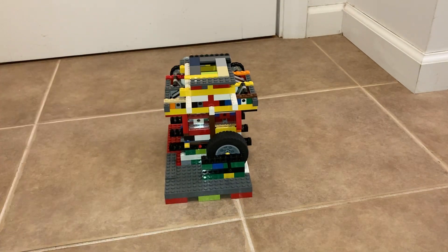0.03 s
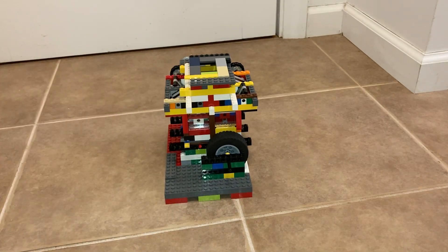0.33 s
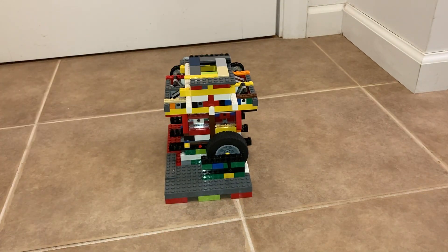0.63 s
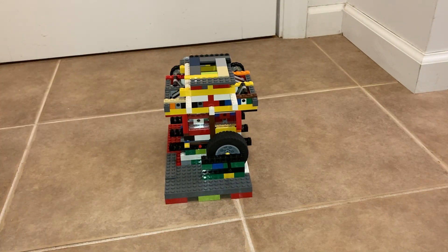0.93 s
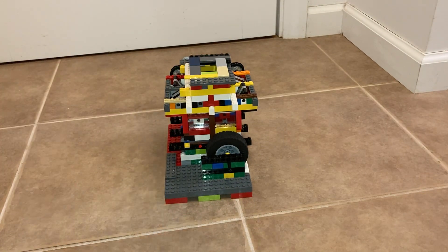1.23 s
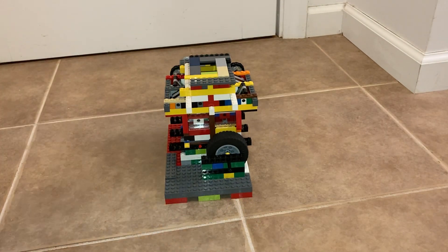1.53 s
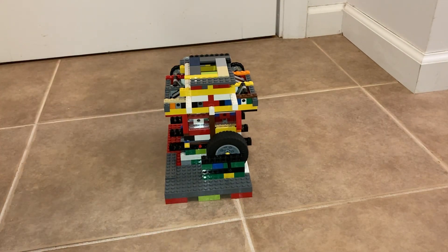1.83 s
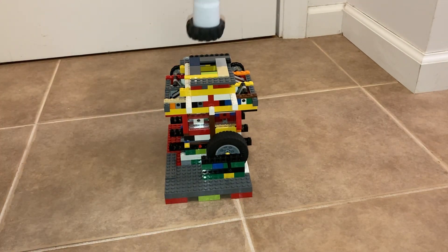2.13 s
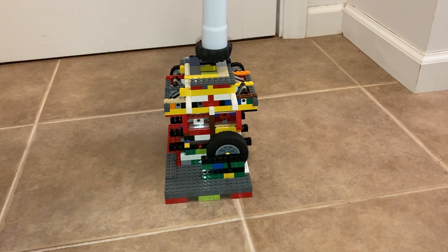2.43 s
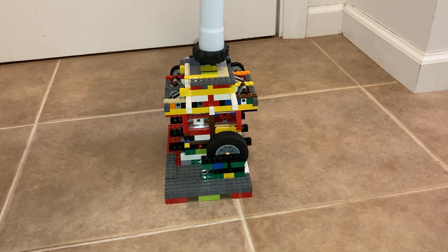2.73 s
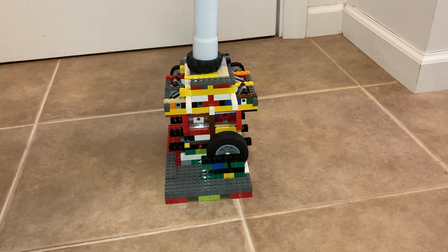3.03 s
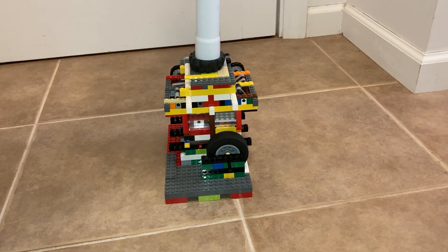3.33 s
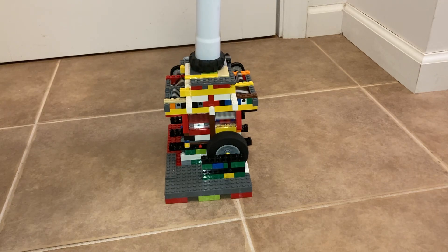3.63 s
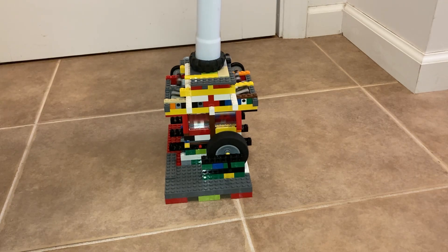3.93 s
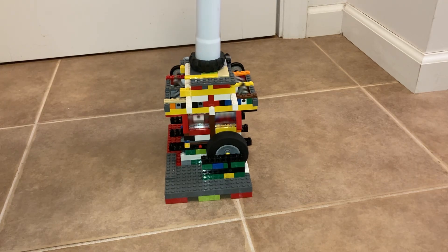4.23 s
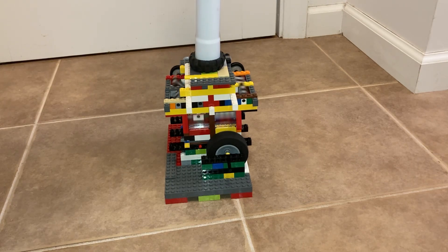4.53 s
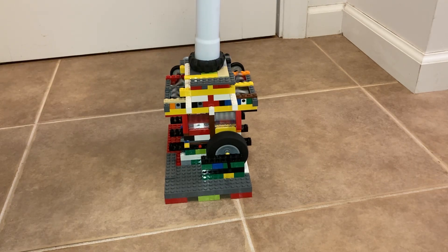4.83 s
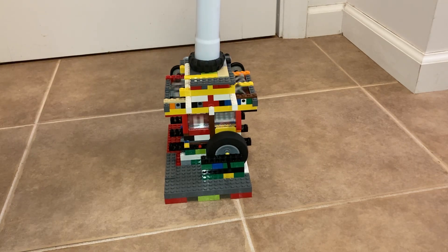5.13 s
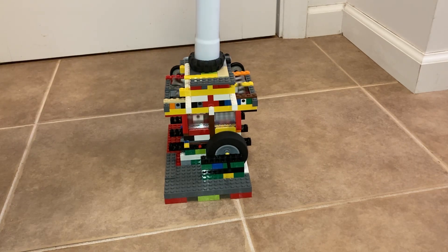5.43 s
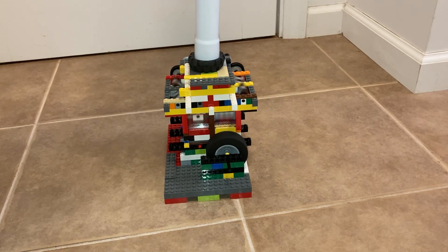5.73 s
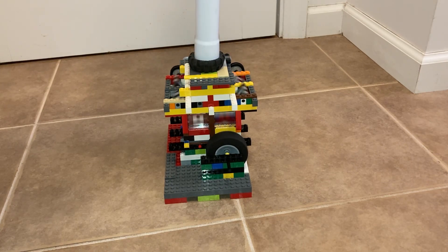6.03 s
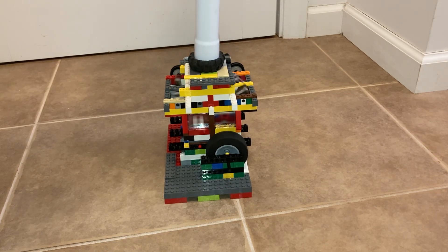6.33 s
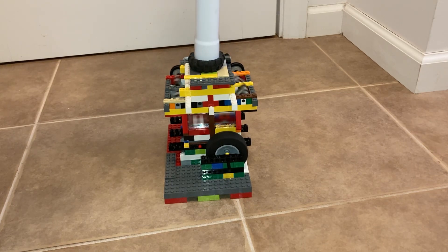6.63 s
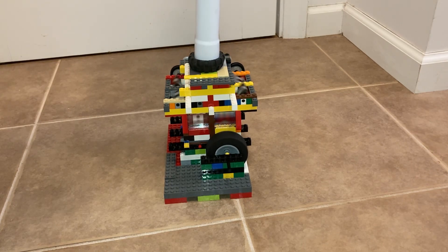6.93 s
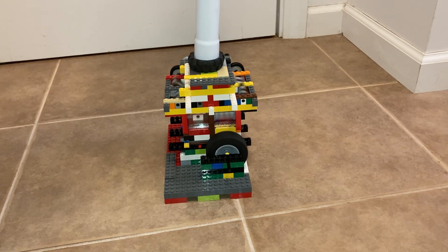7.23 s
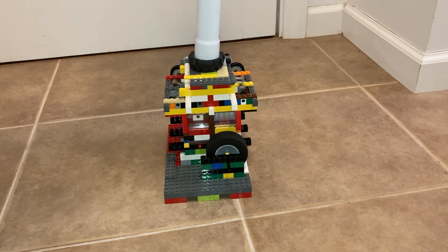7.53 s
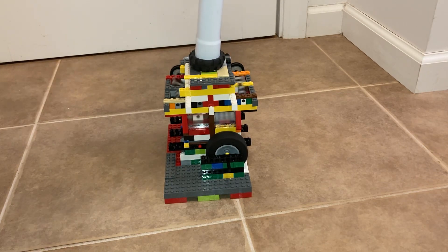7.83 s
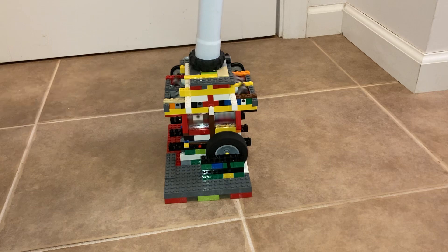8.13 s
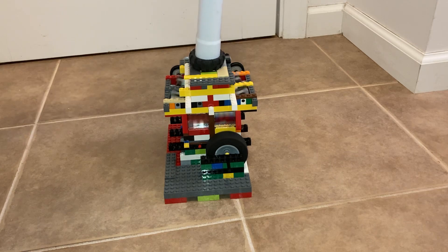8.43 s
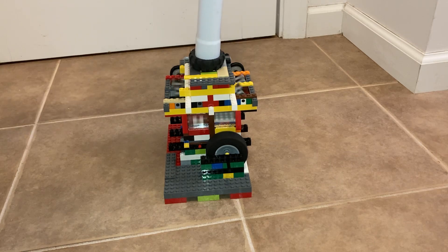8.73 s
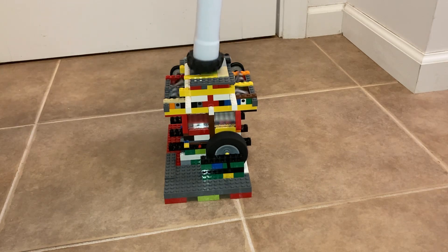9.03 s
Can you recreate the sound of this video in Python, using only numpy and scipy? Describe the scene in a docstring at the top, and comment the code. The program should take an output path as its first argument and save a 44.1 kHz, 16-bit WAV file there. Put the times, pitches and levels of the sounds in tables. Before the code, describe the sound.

A vacuum cleaner spins up to a piercing whine and rush of air, then its suction drives a small rattling, thrumming toy brick engine.

```python
"""A vacuum cleaner spins up to a piercing whine as its fan blades chop the air, in a small tiled room.
First come the knocks and swishes of picking it up. Switched on, its motor jolts, growls and hums,
a bearing squeals briefly and air rushes in. The hose is then set on a little engine of plastic bricks,
which the suction turns: air whistles through its gaps, its piston thrums and its parts rattle.
It is all heard from two points close together, left and right."""
import sys
import numpy as np
from scipy import signal
from scipy.fft import rfft, irfft, next_fast_len
from scipy.io import wavfile
from scipy.ndimage import uniform_filter1d

SR = 44100
rng = np.random.default_rng(int(sys.argv[2]) if len(sys.argv) > 2 else 0)


def output_pcm(signal):
    """Save a mono or channel-first signal as 16-bit PCM at the path in sys.argv[1].

    Samples are clipped to [-1, 1] before scaling.
    """
    pcm = np.clip(np.atleast_2d(signal).T, -1, 1) * 32767
    wavfile.write(sys.argv[1], SR, np.round(pcm).astype(np.int16))


N = 405719
TIME = np.arange(N) / SR
FREQS = np.fft.rfftfreq(N, 1 / SR)

# How alike a noise is on the left and right: pitch_hz, likeness (0 to 1)
SIDE_LIKENESS = [(30, .998), (100, .98), (300, .9), (550, .35), (2000, .3), (4400, .2), (6000, .4),
                 (6900, .9), (7700, .7), (9200, .96), (10200, .7), (11400, .95), (12500, .7), (13700, .97)]
# How much louder the left side is: pitch_hz, left_minus_right_db
SIDE_BALANCE = [(60, 9.5), (200, -9.5), (380, 2), (700, 2.5), (1290, 3), (2380, 3), (4400, 1.5), (8000, 0)]
# How far the left wave runs ahead of the right: pitch_hz, left_lead_rad
SIDE_LEAD = [(0, 0), (2000, 0), (3300, 1.4), (5600, 2.4), (6700, .1), (7400, -.3), (9200, -3.14),
             (11400, -6.28), (12300, -6.8), (13600, -9.42), (14400, -9.7), (15300, -12.5)]
# Tone colour of the quiet room: pitch_hz, gain_db
ROOM_COLOUR = [(10, -18), (25, -4), (70, 4), (150, -7), (500, -7), (1500, -17.5), (15000, -20.5)]
# Tone colour of the hose sliding over cloth: pitch_hz, gain_db
CLOTH_COLOUR = [(100, -16), (900, -13), (2200, 1), (4500, 3), (8000, -0.5), (15000, 0)]
# Each slide of the hose: middle_s, half_length_s, level_db
HOSE_SLIDES = [(0.652, 0.075, -64), (0.92, 0.081, -58.5), (1.192, 0.047, -55), (1.29, 0.028, -57),
               (1.42, 0.038, -46.5), (1.598, 0.06, -41.5)]
# Handling knocks, then the switch: start_s, level_db, pitch_hz, width_octaves, ring_s (to fall 60 dB)
HAND_KNOCKS = [(0.0, -40.5, 2380, 1.26, 0.34), (0.003, -42, 218, 1.1, 0.34), (.254, -56, 407, 0.66, 0.85),
               (.394, -61, 4800, 0.18, 0.3), (.417, -51, 4850, 0.15, 0.08), (.6, -49.5, 169, 0.4, 0.13),
               (.598, -64, 2500, 1.7, 0.13), (.705, -47.5, 85, 0.85, 0.2), (0.706, -60, 2500, 3.2, .2),
               (.795, -59.5, 260, .8, 0.7), (0.956, -46.5, 3650, 1.47, 0.3), (1.37, -60, 130, 0.83, .25),
               (1.494, -38.5, 3480, 1.46, 0.11), (1.53, -45, 606, 0.38, 1)]
# Resonances (favoured pitches) of the plastic wand, heard in every knock: pitch_hz, width_hz, gain_db
WAND_RESONANCES = [(344, 18, 10), (590, 36, 4), (2220, 170, 7), (4820, 160, 9), (6550, 270, -11)]

# Speed of the brick engine: time_s, turns_per_s
CRANK_SPEED = [(3.1, 0), (3.5, 7.5), (4.2, 11.5), (4.5, 14.3), (4.72, 15.2), (5.2, 16.2), (6.2, 16.5),
               (6.8, 16.9), (7.7, 16.8), (8.3, 16), (8.9, 14.1), (9.2, 11)]
# Notes of its loose bricks: pitch_hz, width_hz, gain_db
BRICK_NOTES = [(934, 55, -5), (1028, 31, -2.5), (1113, 58, 3.5), (1370, 115, -4.5), (1600, 150, 4),
               (1824, 150, 0)]
# Resonances of its frame: pitch_hz, width_hz, gain_db
FRAME_RESONANCES = [(97, 14, -7), (187, 12, 3)]
# Single puffs as its piston gets going: peak_s, level_db
FIRST_PUFFS = [(3.39, -49), (3.665, -49), (3.82, -41), (3.95, -48), (4.1, -47), (4.165, -47)]
# Tones in the piston's thrum: beats_per_turn, gain_db
THRUM_TONES = [(2, -18), (4, 0.5)]
# How hard the piston works: time_s, thump_db, throb_db
PISTON_EFFORT = [(3.1, -75, -85), (3.95, -63, -62), (4.3, -54, -58), (4.5, -53, -44), (4.85, -49.5, -43.5),
                 (5.2, -48, -58), (6.2, -49.5, -64), (7.2, -46, -66), (7.6, -47.5, -57), (7.9, -48.5, -44),
                 (8.25, -55, -45), (8.9, -60, -47), (9.2, -62, -66)]

# How much of the air is drawn through the bricks: time_s, share (capped at 1 when used)
HOSE_SEAL = [(2.2, 0), (2.9, 0.01), (3.5, 0.23), (4.4, 0.8), (5, 1.11), (7.6, 0.82), (8.7, 0.64),
             (9.1, 0.37)]
# Tone colour of air entering the open hose: pitch_hz, gain_db
OPEN_AIR_COLOUR = [(15, -37), (60, -19), (90, -12), (200, -11), (300, -2.5), (430, -1), (780, -5),
                   (950, -2.5), (2300, 2.5), (2800, -2), (3900, -1), (6500, -13.5), (8400, -11.5),
                   (11500, -16.5), (15000, -20.5)]
# Tone colour of air passing through the bricks: pitch_hz, gain_db
BRICK_AIR_COLOUR = [(15, -36), (60, -12), (97, -3), (130, -7), (220, -5.5), (350, -4.5), (430, -4.5),
                    (750, -5), (1030, -1.5), (2300, -1.5), (2900, -4.5), (4200, -5.5), (7000, -11),
                    (8400, -12), (10500, -11), (15000, -17.5)]
# Resonances of the hose and casing: pitch_hz, width_hz, gain_db
HOSE_RESONANCES = [(334, 30, 9), (425, 70, -2.5), (665, 35, 6), (805, 36, 5), (938, 40, 10),
                   (1280, 80, 6.5), (1620, 50, 3), (1903, 45, 6), (2810, 170, -4), (3820, 300, 2.5)]
# Whistles in the gaps between bricks: pitch_hz, width_hz, gain_db
GAP_WHISTLES = [(99, 17, 7), (1055, 52, 5), (1800, 26, 5), (6480, 130, 7.5), (8300, 520, 7.5)]
# Hollow spaces in the cleaner that boom: pitch_hz, width_hz, peak_s, rise_s, fall_s, level_db
CAVITY_NOTES = [(338, 13, 1.84, .03, .6, -44), (938, 7, 2.18, .17, .7, -45),
                (1300, 32, 2.12, .12, .2, -43.5)]

# Notes of the casing as the motor jerks into motion: pitch_hz, level_db, ring_s (to fall 60 dB)
JOLT_NOTES = [(452, -32, .22), (680, -42, .7), (845, -37, .5), (1780, -44, .4), (2320, -45, .35)]
# Tones in the starting growl: cycles_per_turn, level_db
GROWL_TONES = [(3, -50.5), (4, -48), (5, -42.5), (8, -50), (12, -48), (16, -44), (21, -44)]
# Tones of the shaking casing: cycles_per_turn, level_db, starting_boost_db
SHAKE_TONES = [(1, -42, 2), (2, -47, 8), (3, -50, 10), (5, -49, 5), (7, -50, 8)]
# How well the casing and room carry the shaking: pitch_hz, gain_db
CASING_RESPONSE = [(100, -32), (160, -5), (205, 0), (236, -2), (246, -25), (259, -22), (266, -5.5),
                   (275, -5.5), (335, 3), (385, -18), (425, -6), (452, 3), (475, -20), (506, -18), (522, 1),
                   (533, -5), (545, -1), (650, -1), (750, -18), (1200, -14), (1318, 2), (1350, -10),
                   (1900, -10)]
# The lowest shake tone swells and fades as the hose moves: time_s, left_db, right_db
HUM_SWELLS = [(2.0, -1, -1), (2.45, 0, 1), (3.2, -2, -1), (3.45, -8, -8), (3.85, 3, 3.5), (4.25, -3, 0),
              (4.58, 0, 5), (4.75, -8, 2), (6.1, -10, -4), (6.7, -2, 1), (7.3, -18, -7), (8.1, -11, 1)]
# Higher motor tones: cycles_per_turn, level_db
MOTOR_TONES = [(4, -61), (7, -53.5), (36, -63)]
# Standing waves (echoes that add up or cancel) along the whine's climb: pitch_hz, width_hz, gain_db
STANDING_WAVES = [(2000, 50, 8), (2123, 22, 11), (2157, 16, 9), (2196, 16, 10), (2234, 18, 9.5),
                  (2270, 18, 7.5), (2316, 22, 8.5), (2334, 7, -6), (2352, 14, 12.5), (2367, 8, -7),
                  (2391, 16, 11), (2402, 6, -9), (2410, 7, 8), (2418, 5, -11)]
# The blade tone as the moving hose shifts those waves: time_s, left_db, right_db, left_lead_rad
BLADE_TONE = [(2.16, -29, -27.5, 1.77), (2.42, -20, -22.5, 1.5), (2.5, -24, -19, 1.8),
              (2.92, -19, -20.5, 1.65), (3.44, -28, -26.5, 2.1), (3.56, -25, -37, 4), (3.62, -25, -41, 0.5),
              (3.74, -27, -36, 0.5), (4.42, -26, -30, 1.7), (5.03, -25.5, -27, 1.16),
              (5.14, -23, -23, 1.08), (6.8, -21.5, -21.5, 1.02), (7.55, -22.5, -25, 0.66),
              (7.72, -26, -30, 0.35), (8.44, -25, -27.0, 0.42), (8.84, -29.5, -28.5, 0.5),
              (8.98, -47, -44, 0.5), (9.04, -53, -33, 3.4), (9.1, -28.5, -28.5, 4.4), (9.18, -25, -50, 3.6)]
# The overtone at twice its pitch: time_s, left_db, right_db, left_lead_rad
BLADE_OCTAVE = [(2.2, -37, -39, 0.9), (2.28, -52, -55, 0.9), (2.37, -39, -46, 0.8), (2.6, -39, -40, 0.37),
                (2.88, -45, -45, 1.9), (3.05, -43, -41, 3.6), (3.3, -40, -41, 3.6), (3.55, -55, -43, 1.2),
                (3.75, -40, -38.5, 2.6), (3.95, -40, -36, 3.1), (4.2, -52, -41, 1.5),
                (4.68, -52, -44.5, 0.8), (4.79, -39, -33.5, 1.8), (5.5, -35.5, -39, 2.6),
                (6.05, -35.5, -44, 2.3), (7.1, -34, -59, 1.3), (7.55, -36.5, -52, 1.9), (7.69, -51, -45, 2),
                (7.85, -42, -48, 1.8), (8.1, -56, -47, 1.8), (8.6, -60, -50, 1)]
# The overtone at three times its pitch: time_s, level_db
BLADE_THIRD = [(2.25, -48), (2.5, -55), (3.3, -52), (3.7, -45.5), (4.7, -50), (7.45, -51), (7.6, -47),
               (8.5, -47), (8.75, -59)]

FULL_SPEED_HZ = 271.35  # turns of the motor shaft per second
SIDES = np.array([[0.5], [-0.5]])  # splits a difference between left and right


def amp(db):
    """Turn decibels into a gain to multiply by."""
    return 10 ** (np.asarray(db) / 20)


def unit(x):
    """Scale a signal to an average strength (rms) of 1."""
    return x / np.sqrt(np.mean(x ** 2) + 1e-20)


def tone(angle, db):
    """A pure tone at a given rms level."""
    return np.sqrt(2) * amp(db) * np.cos(angle)


def swell(peak_s, rise_s, fall_s):
    """A smooth rise to 1 and a smooth fall."""
    return np.exp(-((TIME - peak_s) / np.where(TIME < peak_s, rise_s, fall_s)) ** 2 / 2)


def over_time(rows):
    """Join the points of a timed table into one curve per value column."""
    times, *columns = np.transpose(rows)
    return [np.interp(TIME, times, column) for column in columns]


def over_pitch(points, hz=FREQS):
    """Look up a table by pitch, joining its points on a log scale."""
    pitches, values = np.transpose(points)
    return np.interp(np.log(hz + 1), np.log(pitches + 1), values)


def bumps(resonances, at=FREQS):
    """The boost or cut in dB that resonances give to each pitch."""
    return sum(db / (1 + (2 * (at - hz) / width) ** 2) for hz, width, db in resonances)


def wander(rate_hz):
    """A smooth random wobble of rms 1, mostly slower than the given rate."""
    t = np.arange(0, N / SR + 0.0084, .001)
    spectrum = rfft(rng.standard_normal(len(t)))
    slow = irfft(spectrum / (1 + (np.fft.rfftfreq(len(t), t[1]) / rate_hz) ** 2), len(t))
    return np.interp(TIME, t, unit(slow))


def noise(gain, size=N):
    """Stereo noise of a given tone colour; its treble reaches one side before the other."""
    size = next_fast_len(size)
    hz = np.fft.rfftfreq(size, 1 / SR)
    left, other = rfft(rng.standard_normal((2, size)))
    likeness = np.clip(over_pitch(SIDE_LIKENESS, hz), 0, 1)
    lag = np.exp(-1j * np.interp(hz, *np.transpose(SIDE_LEAD)))
    right = (likeness * left + np.sqrt(1 - likeness ** 2) * other) * lag
    tilt = amp(over_pitch(SIDE_BALANCE, hz) / 2)
    return irfft(np.array([left * tilt, right / tilt]) * np.interp(hz, FREQS, gain), size)[:, :N]


def room_echo(x, ring_s):
    """Dense echoes off tiles and doors, different on each side."""
    t = TIME[:SR // 2]
    tail = rng.standard_normal((2, len(t))) * (rng.random((2, len(t))) < .05)
    tail *= amp(-60 * t / ring_s) * (t > .004)
    tail /= np.linalg.norm(tail, axis=1, keepdims=True)
    return signal.oaconvolve(np.atleast_2d(x), tail, axes=1)[:, :N]


def still_air(level_db=-65):
    """The faint, low noise of the quiet room."""
    return amp(level_db) * unit(noise(amp(over_pitch(ROOM_COLOUR))))


def swishes():
    """The hose rubs over cloth in short, hissy slides."""
    slides = sum(amp(db) * swell(middle_s, half_s, half_s) for middle_s, half_s, db in HOSE_SLIDES)
    return unit(noise(amp(over_pitch(CLOTH_COLOUR)))) * slides * amp(1.8 * wander(29))


def knocks(attack_s=0.00056, crack=0.55, crack_s=0.0041):
    """Each bump of the plastic wand starts with a crack and dies away in the room."""
    t, out = TIME[:SR // 2], np.zeros((2, N))
    for start_s, db, hz, octaves, ring_s in HAND_KNOCKS:
        band = np.exp(-(np.log2((FREQS + 1) / hz) / octaves) ** 2 / 2)
        colour = band / np.sqrt(FREQS + 20) * amp(bumps(WAND_RESONANCES))
        knock = unit(noise(colour, size=len(t))[:, :len(t)]) * amp(db - 60 * t / ring_s)
        knock *= (1 - np.exp(-t / attack_s)) * (1 + crack * np.exp(-t / crack_s))
        start = round(start_s * SR)
        out[:, start:start + len(t)] += knock
    return out


def ticks(crank, pace, level_db=-50.5, spread_db=5, fade_s=0.0023):
    """Small parts tick at each end of the piston's stroke."""
    strokes = np.diff(np.floor(crank / np.pi), prepend=0)
    strokes *= amp(spread_db * np.clip(rng.standard_normal(N), -2, 2))
    bursts = signal.oaconvolve(strokes, np.exp(-TIME[:SR // 8] / fade_s))[:N]
    bright = amp(over_pitch([(300, -32), (1100, -45), (4000, -8), (12000, -10)]))  # pitch_hz, gain_db
    return amp(level_db) * pace * unit(bursts * noise(bright))


def clatter(crank, pace, level_db=-38.6, hits_per_s=800, bunching=.6, spread_db=4, echo_db=-7):
    """Loose bricks chatter in clusters, twice a turn, each ringing briefly."""
    chance = hits_per_s / len(BRICK_NOTES) / SR * (1 + bunching * np.cos(2 * crank))
    t, out = TIME[:SR // 20], np.zeros((2, N))
    for hz, width, db in BRICK_NOTES:
        hits = (rng.random(N) < chance) * pace ** 1.5
        hits *= amp(db + spread_db * np.minimum(rng.standard_normal(N), 2.2))
        ring = np.exp(-np.pi * width * t) * np.sin(2 * np.pi * hz * t + rng.normal(0, 1.0, (2, 1)))
        ring *= amp(over_pitch(SIDE_BALANCE, hz) * SIDES)
        out += signal.oaconvolve(hits[None], ring, axes=1)[:, :N]
    out = signal.sosfilt(signal.butter(2, [700, 2600], "bandpass", fs=SR, output="sos"), out)
    return amp(level_db) * unit(out + amp(echo_db) * room_echo(out, ring_s=0.27))


def piston(crank, pace, catch_s=4.05, falter_s=9.05, fade_s=.17, thrum_db=-51.5, thump_hz=(95, 290)):
    """The piston puffs, then thrums; each turn it throbs six times and thumps the frame once."""
    boom_hz = FRAME_RESONANCES[0][0]
    puffs = sum(tone(2 * np.pi * boom_hz * (TIME - s), db) * swell(s, rise_s=.014, fall_s=.022)
                for s, db in FIRST_PUFFS)
    running = np.clip(np.minimum(TIME - catch_s, falter_s - TIME) / fade_s, 0, 1)
    thrum = sum(tone(k * crank, thrum_db + db + 0.55 * wander(6)) for k, db in THRUM_TONES)
    thump_db, throb_db = over_time(PISTON_EFFORT)
    throb = tone(6 * crank + 0.23 * wander(21), throb_db + 2 * wander(7.2))
    blows = np.diff(np.floor(crank / (2 * np.pi)), prepend=0) * (1 + .18 * rng.standard_normal(N))
    push = signal.sosfilt(signal.butter(2, thump_hz, "bandpass", fs=SR, output="sos"), blows)
    frame = sum(amp(db) * signal.lfilter(*signal.iirpeak(hz, hz / width, SR), push)
                for hz, width, db in FRAME_RESONANCES)
    return puffs + thrum * running * np.sqrt(pace) + throb + amp(thump_db) * unit(push + frame)


def rim_whistle(level_db=-40.5):
    """Air whistles past the rim as a high hiss until the hose sits tight."""
    hiss = unit(noise(amp(bumps([(10100, 6200, 15)]))))  # pitch_hz, width_hz, gain_db
    return hiss * amp(level_db) * swell(peak_s=3.26, rise_s=0.27, fall_s=0.035)


def airflow(crank, speed, rush_db=-36.5, hiss_db=-43, split_hz=4500, chop=0.017, ripple_db=1.3):
    """Air swirls in the hose, then in the engine's gaps; its valve chops the rush twice a turn."""
    seal = np.clip(over_time(HOSE_SEAL)[0], 0, 1)
    # The room's resonances make some pitches a little louder than others.
    ripple = uniform_filter1d(rng.standard_normal(len(FREQS)), size=170)
    ripple = ripple_db * unit(uniform_filter1d(ripple, size=120))
    open_db = over_pitch(OPEN_AIR_COLOUR) + bumps(HOSE_RESONANCES)
    sealed_db = over_pitch(BRICK_AIR_COLOUR) + 0.6 * bumps(HOSE_RESONANCES) + bumps(GAP_WHISTLES)

    def flow(part, low_hz, high_hz):
        """Noise that fades from open hose to bricks, equally strong between the two pitches."""
        out = np.zeros((2, N))
        for db, share in [(open_db, 1 - seal), (sealed_db, seal)]:
            gain = amp(db + ripple)
            band_power = np.mean(gain ** 2 * (FREQS > low_hz) * (FREQS < high_hz))
            out += noise(gain * np.sqrt(part / band_power)) * np.sqrt(share)
        return out

    treble = 1 / (1 + (split_hz / (FREQS + 1)) ** 6)
    rush, hiss = flow(1 - treble, 850, 2000), flow(treble, 5200, 8400)
    # Both grow as the fan speeds up and as the hose seals.
    rush *= amp(rush_db + 3.5 * seal ** 2 - 12 * (1 - speed))
    rush *= 1 + chop * seal * np.cos(2 * crank)
    hiss *= amp(hiss_db + 3 * seal - 36 * (1 - speed) + 0.77 * wander(22.6))
    return (rush + hiss + rim_whistle()) * amp(.5 * wander(32))


def cavities():
    """Hollow spaces boom with the first rush of air, in wavering notes that then sink into it."""
    out = np.zeros((2, N))
    for hz, width, peak_s, rise_s, fall_s, db in CAVITY_NOTES:
        note = unit(noise(1 / (1 + ((FREQS - hz) / width) ** 4)))
        out += note * amp(db) * swell(peak_s, rise_s, fall_s)
    return out


def shaft(switch_s=1.5, spin_up_s=.19, seating_s=(2.95, 3.6), relief_hz=1.1, sag_hz_per_s=.395):
    """The motor spins up, then slowly sags: gives its angle, spin-up (0 to 1) and power (0 to 1)."""
    running_s = np.maximum(TIME - switch_s, 0)
    speed = np.tanh((running_s / spin_up_s) ** .75)
    relief = np.interp(TIME, seating_s, (0, relief_hz))  # starved of air, the fan runs a little faster
    sag = sag_hz_per_s * np.maximum(TIME - seating_s[1], 0)
    hz = FULL_SPEED_HZ * speed + relief - sag + 0.12 * wander(9.1)
    return 2 * np.pi * np.cumsum(hz) / SR, speed, np.clip(running_s / 0.013, 0, 1)


def bearing(angle, start_s=1.7, end_s=2.75, fade_s=0.056, base_db=-46, arch_db=10.5, per_turn=57.6):
    """The bearing's thin, noisy squeal follows the shaft, swelling and dying away in one arch."""
    narrow = signal.butter(2, 200, fs=SR, output="sos")
    rough = signal.sosfilt(narrow, rng.standard_normal((2, N)) + 1j * rng.standard_normal((2, N)))
    squeal = unit((rough * np.exp(1j * per_turn * angle)).real)  # shifts the noise up in pitch
    inside_s = np.maximum(np.minimum(TIME - start_s, end_s - TIME), 0)
    arch = amp(base_db + arch_db * inside_s / inside_s.max()) * np.minimum(inside_s / fade_s, 1)
    return squeal * arch * amp(3 * wander(40))


def casing_jolt(start_s=1.52, rise_s=.025):
    """The casing rings as the motor jerks into motion."""
    since_s = np.maximum(TIME - start_s, 0)
    ring = sum(tone(2 * np.pi * hz * since_s + 1.1 * wander(30), db - 60 * since_s / ring_s)
               for hz, db, ring_s in JOLT_NOTES)
    return ring * np.minimum(since_s / rise_s, 1)


def starting_growl(angle, speed, rough_db=3, surge_hz=120, surge_depth=.6):
    """The motor pulls hard and unevenly until it is up to speed; its current pulses with the mains."""
    growl = sum(tone(k * angle + 0.25 * wander(40), db) for k, db in GROWL_TONES)
    growl *= np.sqrt(1 - speed) * np.minimum(speed / 0.38, 1) ** 2 * amp(rough_db * wander(60))
    return growl * (1 + surge_depth * np.cos(2 * np.pi * surge_hz * TIME))


def casing_shake(angle, speed, waver_db=2, node_db=8.5, node_lead_rad=2.7):
    """The off-balance motor shakes the casing; the tones flare as they climb through its resonances."""
    strain = np.clip((1 - speed) / 0.032, 0, 1)
    out = np.zeros((2, N))
    for k, db, boost_db in SHAKE_TONES:
        drift = np.array(over_time(HUM_SWELLS)) if k == 1 else waver_db * wander(4.7)
        # At full speed the second tone has a quiet spot (a node) nearby, so left and right differ.
        node = (k == 2) * (1 - strain) * SIDES
        level = db + boost_db * strain + drift + over_pitch(CASING_RESPONSE, k * FULL_SPEED_HZ * speed)
        phase = k * angle + node * node_lead_rad + 0.18 * wander(14)
        out += tone(phase, level + node * node_db) * speed ** min(k, 2)
    return out


def motor_hum(angle, speed, waver_db=4):
    """Higher tones follow the spinning shaft, wavering separately on each side."""
    out = np.zeros((2, N))
    for k, db in MOTOR_TONES:
        phase = k * angle + 0.086 * np.sqrt(k) * wander(32)
        out += [tone(phase + 0.53 * wander(3.2), db + waver_db * wander(2.1)) for side in range(2)]
    return out * speed ** 2


def motor(angle, speed, echo_db=-17):
    """The motor shakes, jolts, growls and hums; the shake and growl echo in the room."""
    shake, jolt = casing_shake(angle, speed), casing_jolt()
    growl, hum = starting_growl(angle, speed), motor_hum(angle, speed)
    echo = amp(echo_db) * room_echo(shake, ring_s=0.95)
    return shake + echo + jolt + room_echo(growl, ring_s=0.079) + hum


def fan_whine(angle, speed, blades=9, flutter_db=0.5, overtone_flutter_db=2):
    """The blades chop the air into a whine with two overtones; swirling air makes them flutter."""
    *blade_db, blade_lead = over_time(BLADE_TONE)
    *octave_db, octave_lead = over_time(BLADE_OCTAVE)
    third_db, = over_time(BLADE_THIRD)
    blade = blades * angle + 0.035 * wander(43)
    flare_db = bumps(STANDING_WAVES, blades * FULL_SPEED_HZ * speed)
    out = tone(blade + SIDES * blade_lead, np.array(blade_db) + flare_db + flutter_db * wander(29))
    out *= speed ** 5.8  # grows steeply with speed, and the overtones below even more so
    for k, db, lead in [(2, np.array(octave_db), octave_lead), (3, third_db, -1.1)]:
        flutter = overtone_flutter_db * np.array([wander(25), wander(8.1)])
        out += tone(k * blade + SIDES * lead + 0.2 * wander(24), db + flutter) * speed ** 24
    # While the pitch climbs, echoes of lower pitches trail behind it.
    trail = np.minimum(3 * (1 - speed), .3)
    return out + trail * room_echo(out, ring_s=0.4)


def scene():
    """The cleaner, the brick engine that it drives, and the hands at work in the quiet room."""
    angle, speed, power = shaft()
    turns_per_s = np.maximum(over_time(CRANK_SPEED)[0], 0)
    crank = 2 * np.pi * np.cumsum(turns_per_s * (1 + .002 * wander(7.6))) / SR  # the engine's angle
    pace = turns_per_s / turns_per_s.max()
    cleaner = fan_whine(angle, speed) + motor(angle, speed) + cavities() + bearing(angle)
    cleaner += airflow(crank, speed)
    engine = piston(crank, pace) + ticks(crank, pace) + clatter(crank, pace)
    return power * (cleaner + engine) + still_air() + swishes() + knocks()


def record(dry, low_cut_hz=26, high_cut_hz=15900):
    """The microphone loses the deepest bass and the highest treble."""
    lean = signal.sosfilt(signal.butter(3, low_cut_hz, "highpass", fs=SR, output="sos"), dry)
    treble_cut = signal.firwin(511, high_cut_hz, window=("kaiser", 9), fs=SR)
    return signal.oaconvolve(lean, treble_cut[None], "same")


dry = scene()
out = record(dry)
output_pcm(out)
```